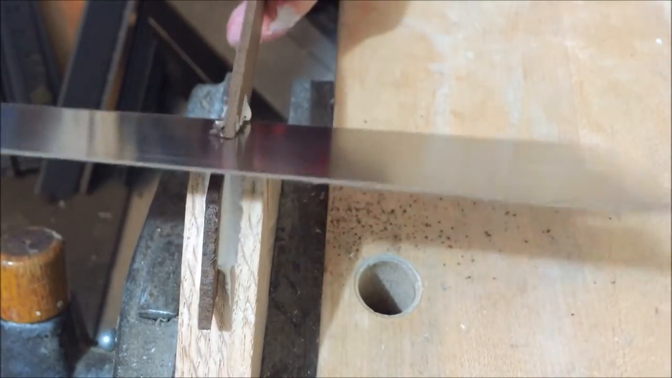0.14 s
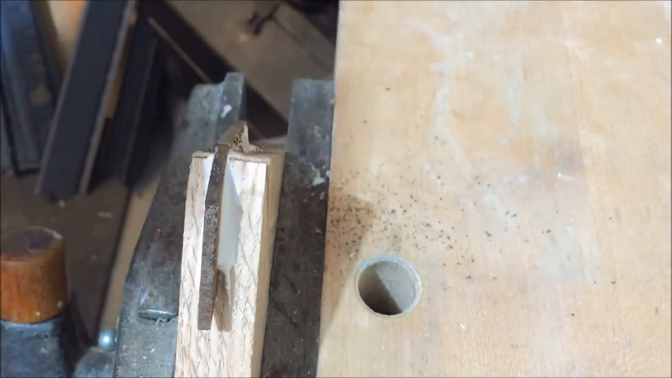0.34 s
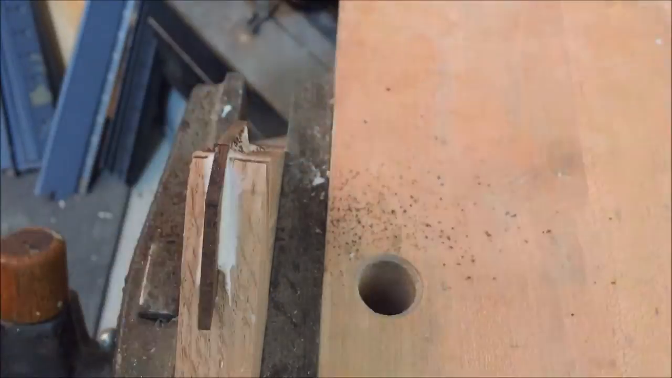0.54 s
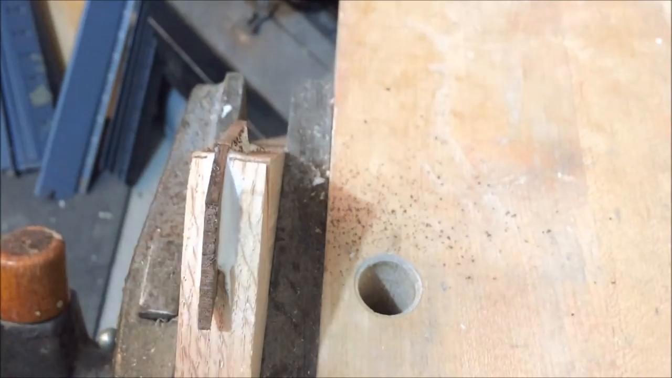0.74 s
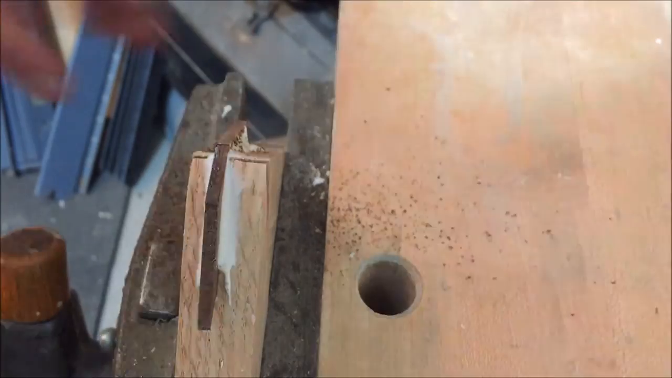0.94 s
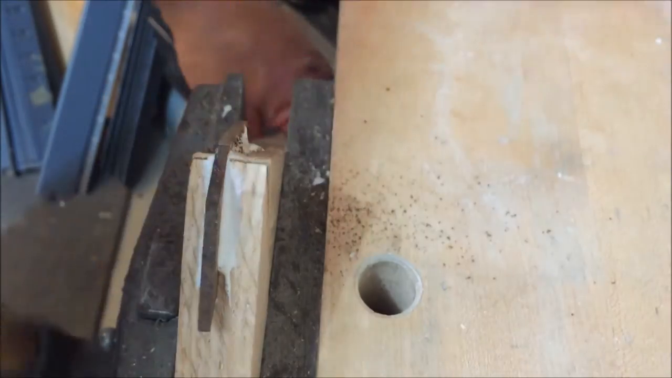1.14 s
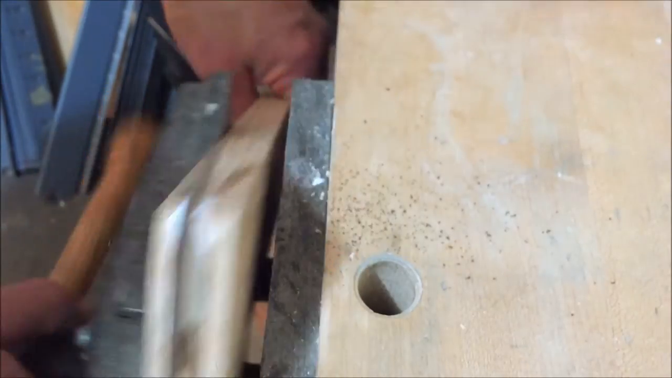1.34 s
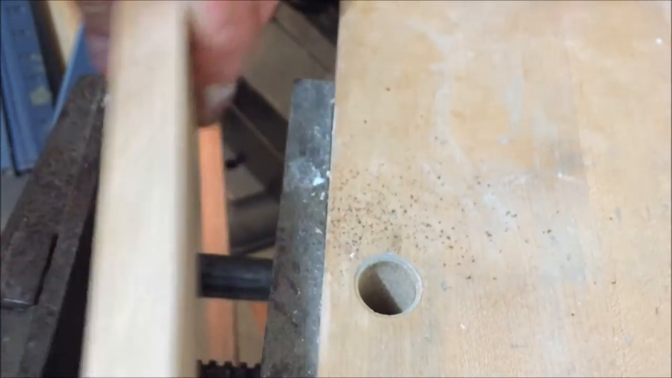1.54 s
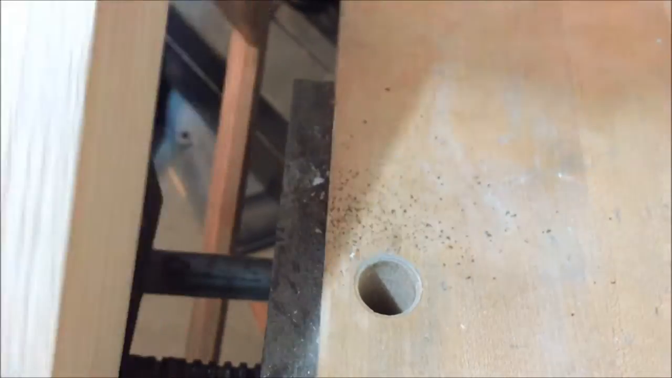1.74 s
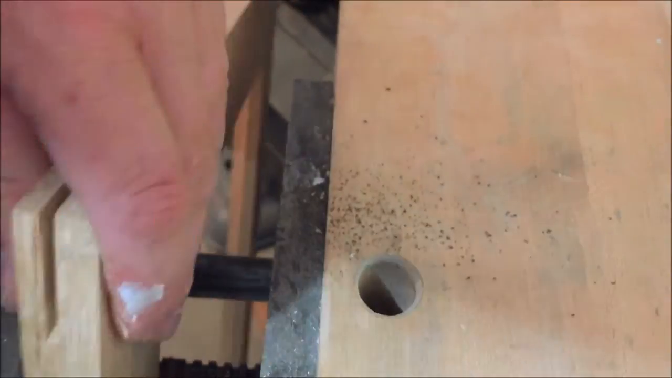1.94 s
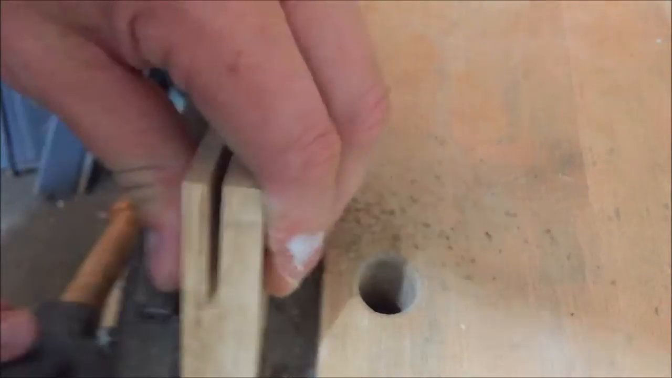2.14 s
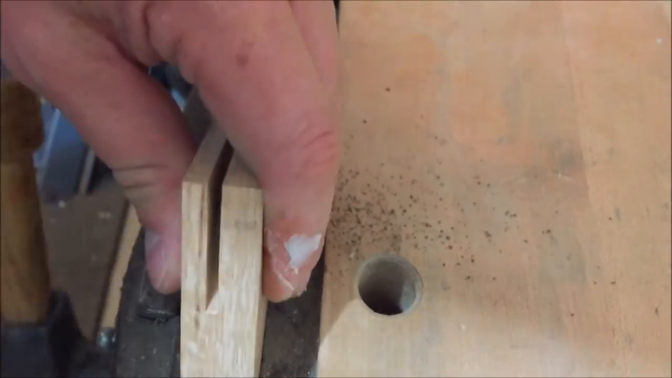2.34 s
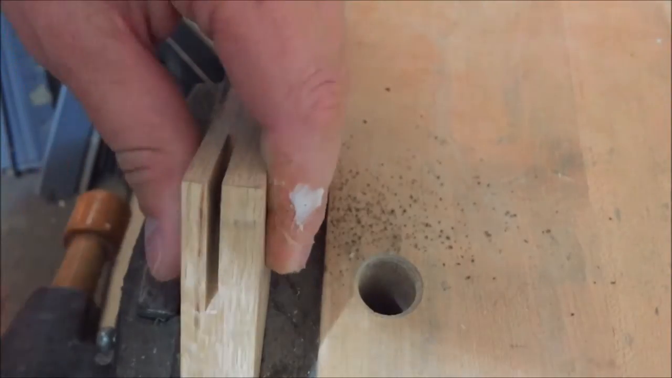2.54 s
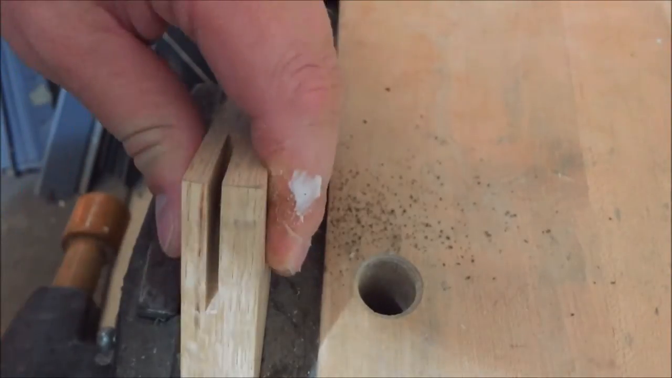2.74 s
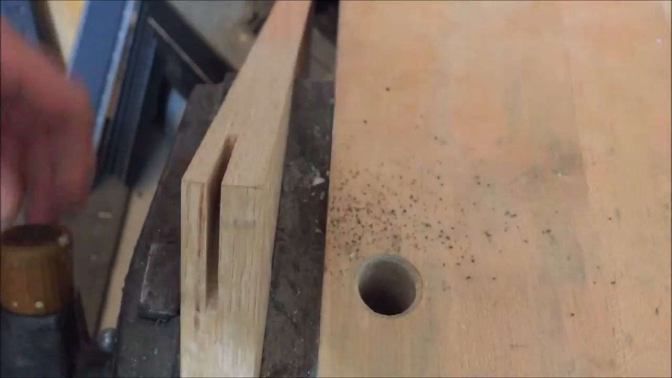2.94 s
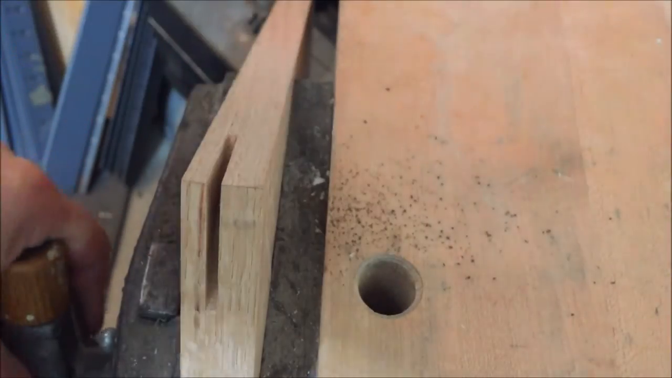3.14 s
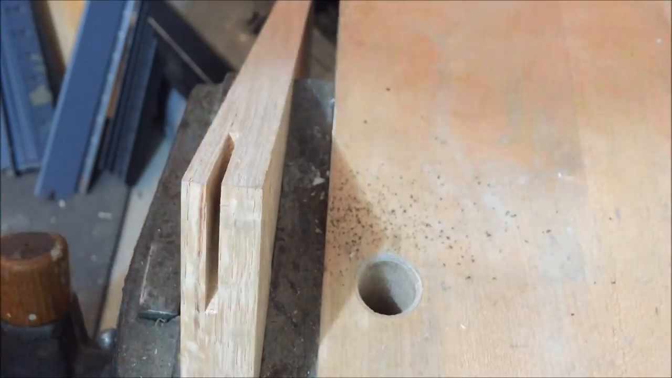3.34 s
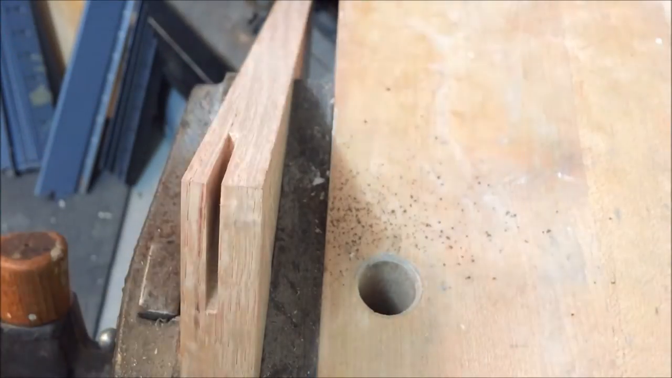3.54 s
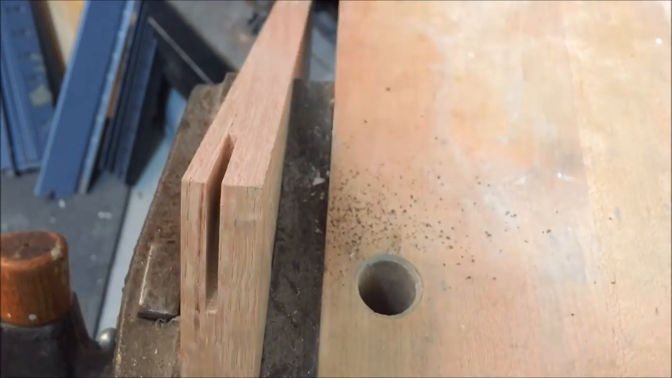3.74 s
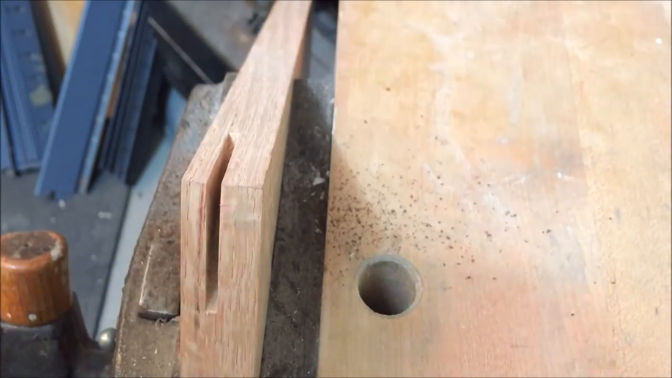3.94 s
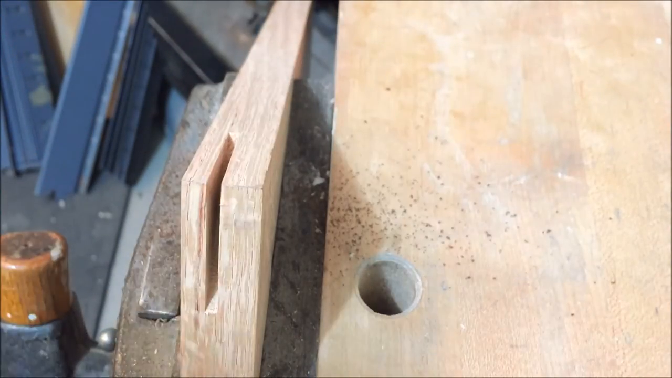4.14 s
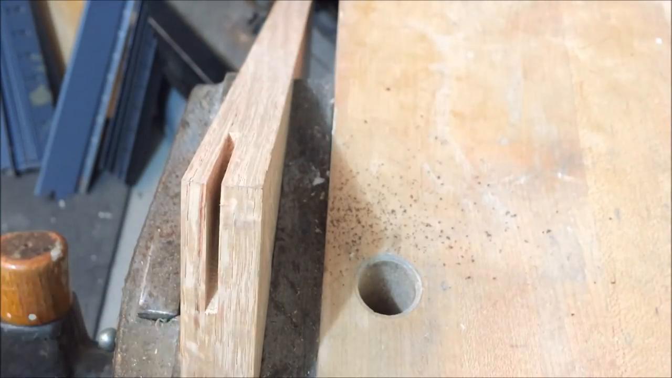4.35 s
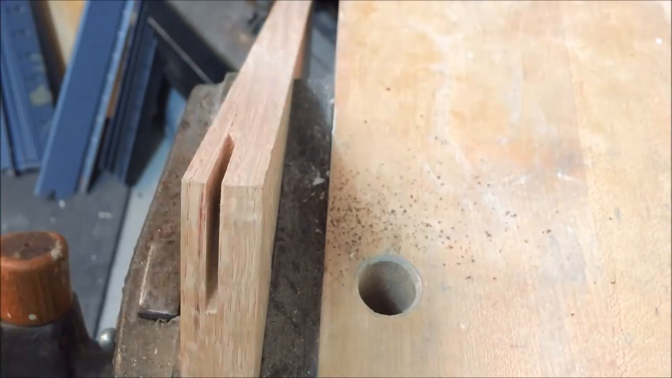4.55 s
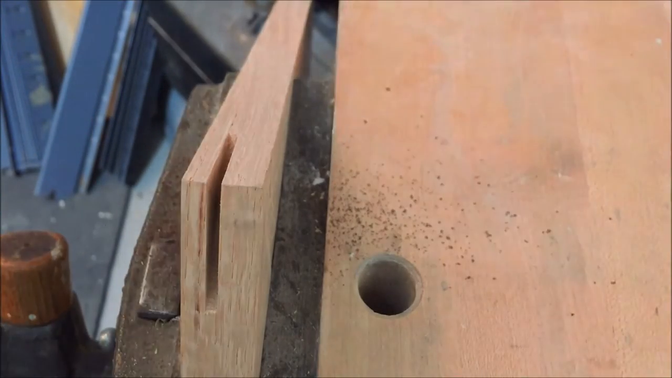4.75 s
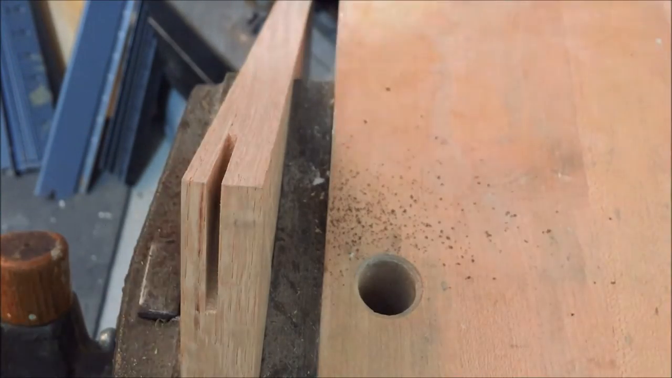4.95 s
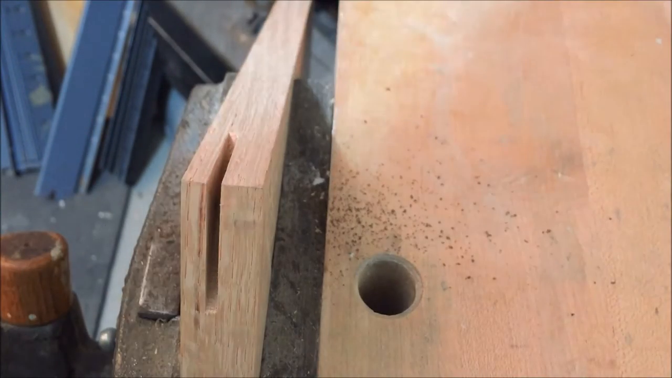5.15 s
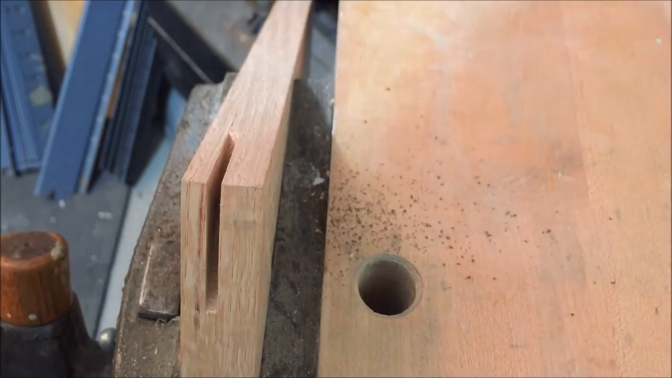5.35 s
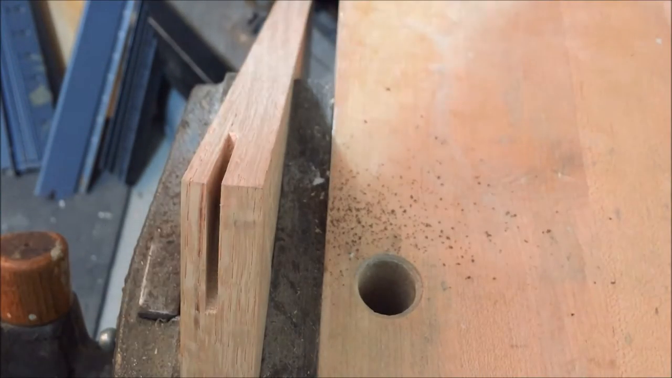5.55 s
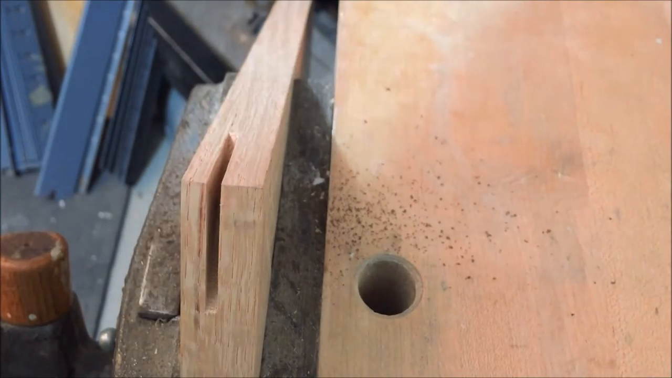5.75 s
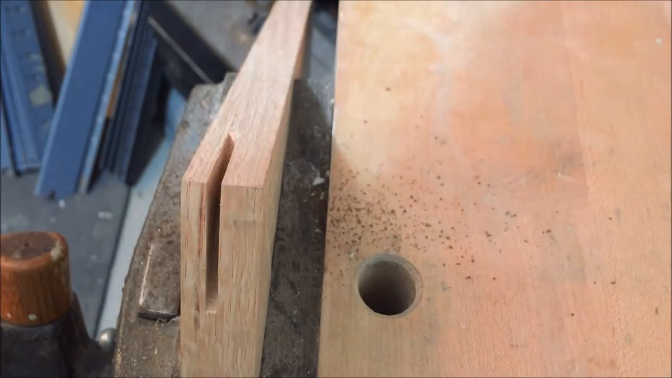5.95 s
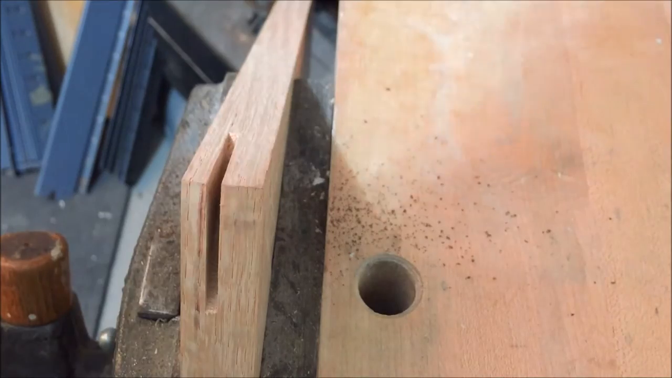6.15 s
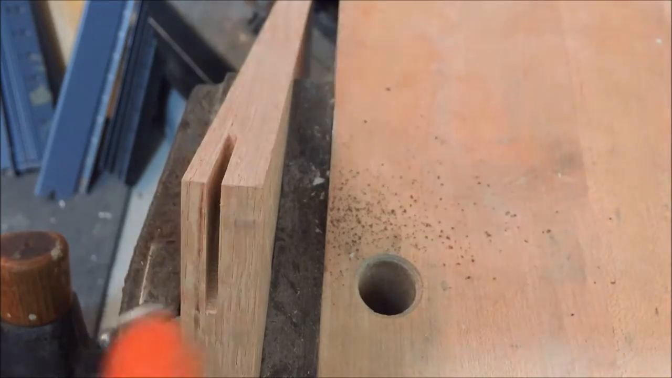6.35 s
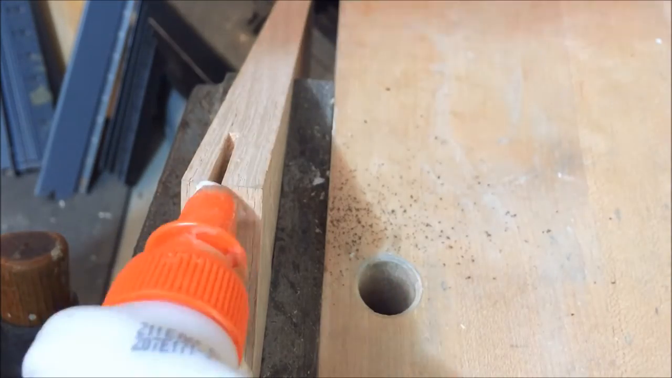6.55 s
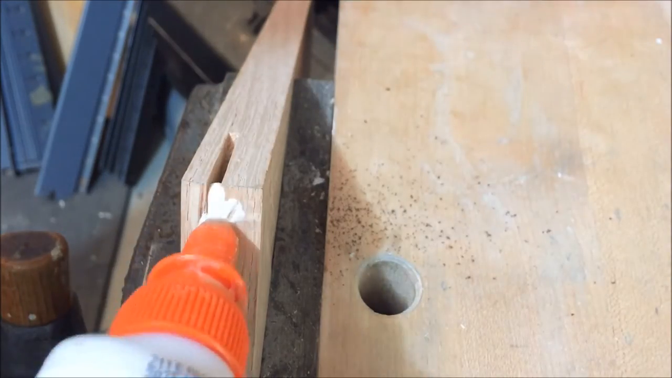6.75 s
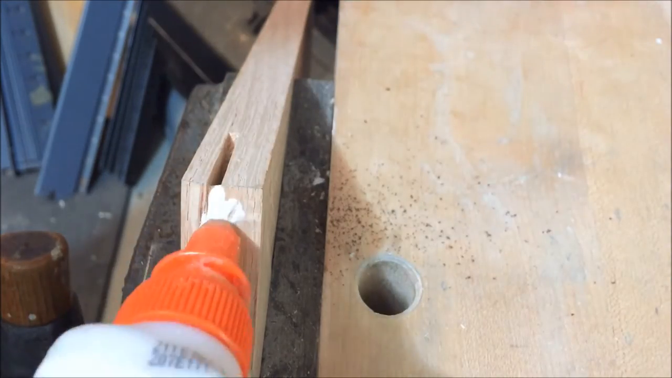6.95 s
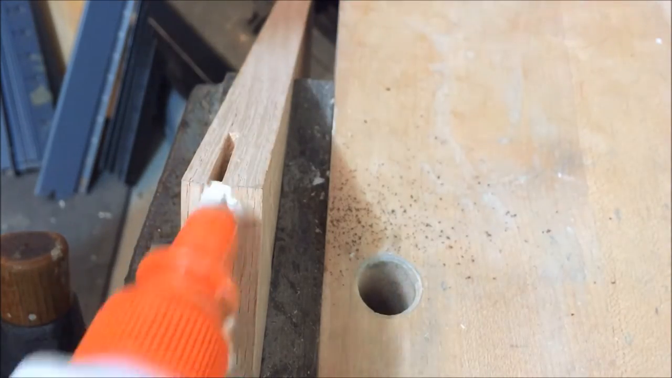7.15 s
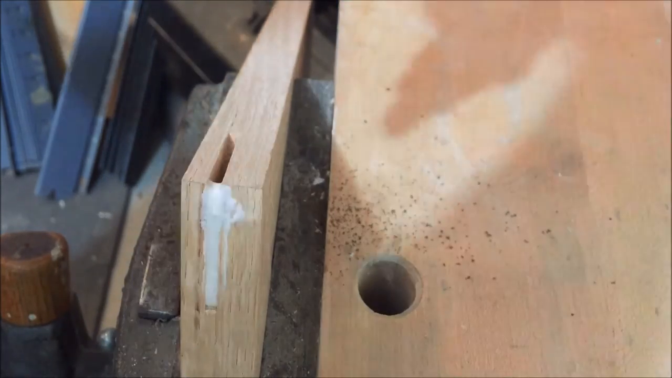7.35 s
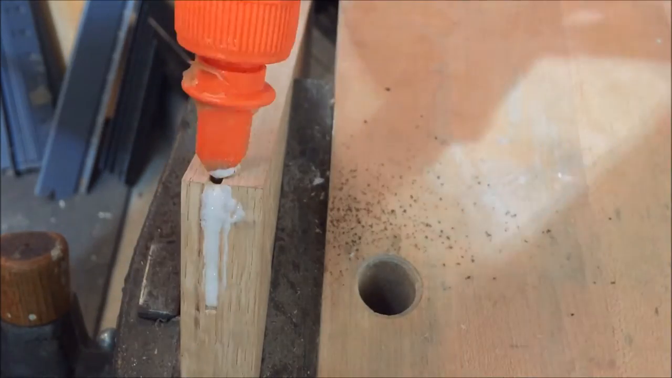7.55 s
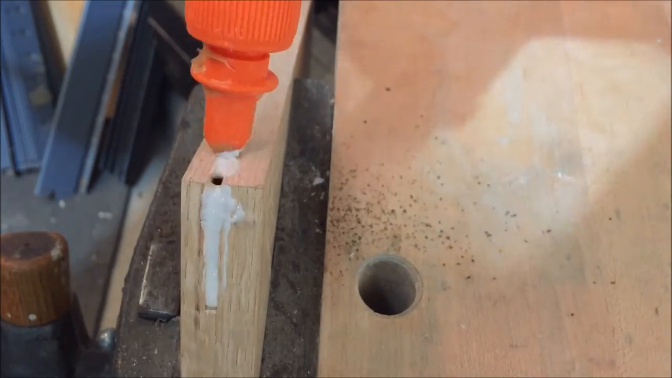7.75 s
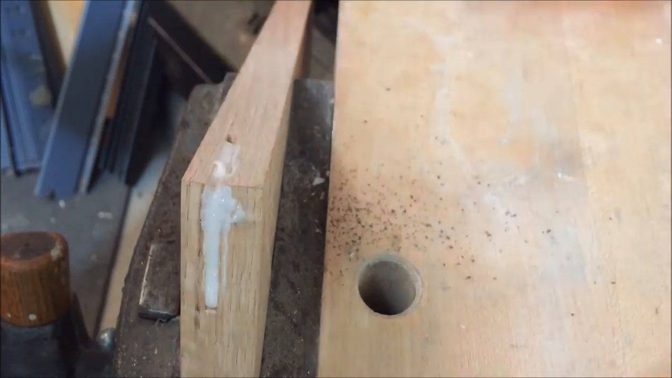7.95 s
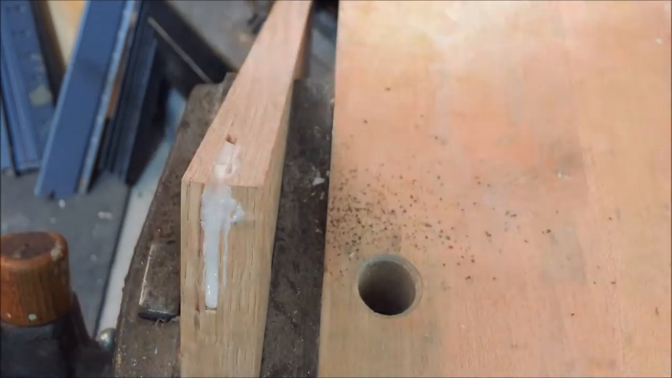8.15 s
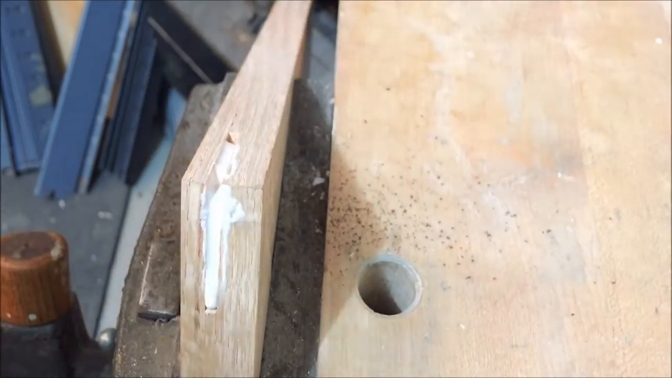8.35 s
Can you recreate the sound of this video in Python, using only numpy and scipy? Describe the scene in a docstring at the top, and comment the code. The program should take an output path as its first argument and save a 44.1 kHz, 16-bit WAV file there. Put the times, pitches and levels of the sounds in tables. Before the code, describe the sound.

Sawing ends with a thin steel ring and sharp clack, a wooden frame bumps into vise jaws, metal clanks, and glue softly blurps.

```python
"""The last strokes of a thin hand saw rasp by; the blade slips free, rings, and bounces down onto the bench.
A wooden frame knocks and rubs on the vise jaws, the screw grates, and the handle clanks on its stop.
Then a glue bottle is tapped and swished and glue pops into the slot, over a faint workshop hum.
Noise-like forces drive decaying modes for saw, wood and steel; glue is short tones, steady or falling in
pitch, touch is shaped noise, and the workshop is coloured air with three wavering fan tones."""
import sys
import numpy as np
from scipy import signal
from scipy.fft import rfft, irfft, next_fast_len
from scipy.io import wavfile

SR = 44100
rng = np.random.default_rng(int(sys.argv[2]) if len(sys.argv) > 2 else 0)


def inscribe(sig):
    """Save sig as 16-bit PCM at rate SR to the path in sys.argv[1].

    A 1-D sig is mono; a 2-D sig holds one channel per row.
    Samples are clipped to [-1, 1] before scaling.
    """
    pcm = np.round(np.clip(np.atleast_2d(sig).T, -1, 1) * 32767)
    wavfile.write(sys.argv[1], SR, pcm.astype(np.int16))


N = 369999
TIME = np.arange(N) / SR

# still workshop air, spectrum before levelling: f/Hz, level/dB
AIR_COLOUR = [(18, -75), (30, -40.5), (75, -44), (165, -20.5), (189, -12), (221, -17.5), (437, -18.5),
              (473, -6), (526, -20.5), (1250, -22), (1350, -26.5), (2540, -31), (3060, -31), (4080, -30.5),
              (16000, -35.5)]
# tones of a running fan: f/Hz, rms level/dB, pitch wander/Hz
FAN_TONES = [(197.6, -77.5, 3.9), (480.6, -72.5, 1.5), (2577, -90.5, 8)]
AIR_DB = -73

# fingers swishing on the bottle: start t/s, end t/s, level/dB
SWISHES = [(3.47, 3.6, -68.5), (4.166, 4.234, -53.5), (4.963, 5.025, -50.5), (5.142, 5.203, -66),
           (5.543, 5.6, -68.5), (6.385, 6.514, -48), (8.061, 8.11, -60)]
# colour of skin and rustle: f/Hz, level/dB
SWISH_COLOUR = [(500, -4), (2500, -18.5), (4200, -9), (6000, -2.5), (10000, 2), (15500, 2)]
# air pockets bursting in the glue: t/s, tone level/dB, start f/Hz, glide/(octaves/s; rises are held flat), t60/s
GLUE_POPS = [(6.485, -53, 973, -85, 0.21), (6.5727, -49, 888, -29, 0.014), (6.5883, -38.5, 840, -59, 0.014),
             (6.713, -48.5, 775, -53, 0.011), (6.8254, -44, 1110, 0.5, 0.0066),
             (6.9459, -39.5, 781, -8, 0.019), (6.961, -59, 986, 0, 0.015), (6.998, -50, 920, 4, 0.0098),
             (7.067, -52.5, 794, -104, 0.017), (7.073, -45, 344, -52, 0.031), (7.215, -51.5, 765, 0, 0.016),
             (7.534, -51, 330.5, -29, 0.071)]

# Body modes, t60 before any damping by hand, cut or jaws: f/Hz, level/dB, t60/s
# glue bottle
BOTTLE_MODES = [(272, -1.5, 0.089), (410, 4, 0.09), (526, 17, 0.09), (820, -11, 0.019), (1050, -1, 0.061),
                (1200, 15.5, 0.088), (1370, 6.5, 0.15), (1485, 7.5, 0.063)]
# vise screw and its handle
HANDLE_MODES = [(570.7, -11.5, .11), (1235, -11, .14), (1284, 9, 0.037), (1410, -1, 0.095),
                (1871, -11, 0.055), (2768, -5, 0.016), (3731, 4, .025), (5156, -8, 0.026),
                (10000, -10, 0.043), (10390, 7, .026), (9900, -8, .022), (10000, -31.5, 0.41),
                (10500, -26, 0.26)]
# wooden frame in the jaws
FRAME_MODES = [(308.2, 2, .1), (400, -2, 0.11), (572, 0.5, 0.13), (640, -3.5, 0.13), (908, -0.5, 0.19),
               (1100, 1, 0.087), (1244, 7, 0.1), (1500, -3.5, 0.12), (2975, -3.5, .045),
               (3470, -1.5, 0.032), (4235, 1.5, 0.061), (8250, -4.5, 0.023), (10570, 3.5, 0.038),
               (14200, -5, .025)]
# bench with the saw on it
BENCH_MODES = [(267, -7, 0.11), (530, -7, .07), (1247, -0.5, 0.083), (1286, -2, 0.098), (1430, -0.5, 0.077),
               (1574, 1, 0.042), (2230, -7, 0.015), (3850, -7, 0.023), (3980, 0.5, .035),
               (4120, -3.5, 0.033), (4917, -2.5, 0.03965), (9800, -0.5, 0.044)]
# steel saw blade
BLADE_MODES = [(2010, 0, 0.14), (2684, -1.5, 2.2), (3200, -16.5, 1.1), (3945, 1, 0.18), (4040, 7, 0.11),
               (4580, -0.5, .5), (6471, -5, 0.27), (7180, 5, 0.27), (7340, -1, 0.81), (9076, -14, 1),
               (10030, 4, 0.17), (11500, -3, 0.42), (13130, -8, 0.44)]

# Blows: t/s, level/dB, brightness/(dB/octave above the second band), thud/dB re level
# fingers and nozzle tap the bottle
BOTTLE_TAPS = [(4.9101, -77, 6.5, -5.5), (5.19, -69, 2.5, -4), (6.2466, -66.5, -2, -5),
               (6.945, -67.5, 1, 3), (7.499, -76, -2, -10), (8.2374, -55, -2, 10),
               (8.247, -64.5, -6.5, 6.5)]
# the vise handle drops on its stop
HANDLE_CLANKS = [(2.9532, -44, -5, -12), (2.959, -33, 4, -11.5), (3.055, -73.5, 3.5, 10)]
# the frame knocks on the jaws; the last three rows, after 4 s, are further knocks with the same ring
FRAME_KNOCKS = [(.8545, -54.5, 2.5, -4.5), (.8775, -58, 7, -22), (.8803, -58.5, 7, 2.5),
                (.9593, -55, -1, -24), (1.1063, -44.5, 0, -11), (1.1205, -46.5, 0.5, -25),
                (1.1477, -38.5, -4.5, -13), (1.1997, -39, 3.5, -9.5), (1.262, -50, -4.5, -19),
                (1.281, -52.5, 1, -30), (1.3295, -56.5, -8.5, -4), (1.385, -40, 4.5, -6),
                (1.371, -57, -9.5, 2), (1.43, -51, 0.5, -3), (1.453, -55.5, 0.5, 5), (1.5873, -39, -4.5, 5),
                (1.6395, -47, -3, -23), (1.6893, -50, -8.5, -3), (1.7877, -61, -9.5, 8.5),
                (1.9978, -34, -1, -4), (2.0594, -47.5, 2.5, -6.5), (2.069, -52, 1.5, -8),
                (2.17, -33, -1.5, -6), (2.1745, -41.5, 3, 2.5), (2.178, -38, 3.5, -5),
                (2.192, -37.5, 1, -4), (2.2567, -52.5, 0, -15.5), (2.3466, -41.5, -4, -18),
                (2.3763, -49, 5, -4.5), (2.409, -50.5, -11, -1), (2.4515, -47.5, -4.5, -7.5),
                (2.4726, -55.5, -15, 4), (2.6064, -55.5, -4, -36), (2.8097, -61, -8.5, 1.5),
                (4.014, -56.5, -13.5, 4), (4.1577, -57, -12.5, -7), (4.2086, -57.5, 1, -13)]
# the saw bounces on the bench
SAW_BOUNCES = [(.6422, -34.5, 1.5, -22.5), (.6494, -27, 1.4, -15.5), (.674, -34.5, 2, -13),
               (.6893, -38.5, -4, -19), (.699, -45, -2.5, -2.5)]
# edges of the bands that make up a blow: f/Hz
BLOW_EDGES_HZ = [240, 700, 2500, 7000, 17000]

# the vise screw turning in its nut: start t/s, end t/s, level/dB
SCREW_TURNS = [(2.335, 2.415, -43.5), (2.79, 2.85, -78), (2.935, 2.96, -51), (3.17, 3.225, -67),
               (3.278, 3.305, -60), (3.305, 3.335, -75.5), (4.165, 4.245, -58.5)]
# saw and frame sliding on bench and jaws: start t/s, length/s, level/dB, brightness/(dB/octave)
SLIDES = [(0.557, .04, -74.5, 8.5), (0.599, 0.065, -52, 6), (0.643, 0.089, -47.5, 4),
          (0.851, 0.047, -49, 4.5), (0.946, 0.015, -58, 6), (1.05, .015, -77, 11),
          (1.067, .028, -48.5, 5.5), (1.098, 0.092, -52, -4), (1.22, 0.048, -53, -1.5),
          (1.382, 0.076, -44, -2), (1.53, 0.021, -63.5, 3), (1.645, 0.098, -52.5, -1.5),
          (1.786, 0.037, -79, -10.5), (1.85, 0.062, -80, 5.5), (2.002, 0.1, -59, -0.5),
          (2.121, 0.057, -49, -2.5), (2.154, 0.064, -45.5, 0), (2.236, 0.044, -61, -3),
          (2.337, 0.058, -42, 0), (2.384, 0.069, -54, -1), (2.81, .035, -69, -2), (2.85, .03, -72, -0.5),
          (2.926, 0.12, -59.5, -0.5)]
# edges of the rumble, scrape and hiss bands: f/Hz
SLIDE_EDGES_HZ = [230, 700, 5000, 17000]
# rasp of rough faces: f/Hz, level/dB
RASP_COLOUR = [(200, 0), (550, -4.5), (1300, -1.5), (2000, -4.5), (4300, -4.5), (7000, -8.5), (10500, -5.5),
               (16000, -12)]
# each push creeps in, eases off and stops
SLIDE_ATTACK_S, SLIDE_SAG_DB_PER_S, SLIDE_RELEASE_T60_S = 0.0088, -70.5, .12
SLIDE_ARCH_DB = -3  # rumble and hiss lie this far under the scrape in between

# the free blade swings past edge-on, then is stilled: t/s, level/dB
BLADE_SWING = [(.29, -0.5), (.32, -2.5), (.35, 1), (.385, -7.5), (.42, 2), (.465, -1.5), (.485, -16),
               (.56, -19.5)]
# saw strokes, back and forth: start t/s, length/s, level/dB
SAW_STROKES = [(-0.035, 0.06, -33.5), (0.024, .066, -37.5), (.091, 0.061, -26.5), (0.165, 0.0627, -37.5),
               (.229, .041, -30.5)]
# rasp of the saw teeth: f/Hz, level/dB
SAW_COLOUR = [(90, -35), (170, -22.5), (300, -14), (450, -10), (800, -17), (1450, -5), (1750, -8.5),
              (2700, -5), (4500, -5.5), (6500, 0), (7600, 11.5), (9200, -3.5), (11000, -1), (15000, -7.5)]
# the blade still chatters as it turns round, and dies away after the last stroke
SAW_TURN_DB, SAW_STOP_T60_S = -47, 0.1513

TOP_HZ = 15900  # upper edge of the microphone


def undb(db):
    """Decibels to gain."""
    return 10 ** (np.asarray(db) / 20)


def unit(x):
    """Scale to rms 1."""
    return x / np.sqrt(np.mean(x ** 2) + 1e-30)


def add(track, s, sound):
    """Mix a sound in at time s."""
    i = max(int(s * SR), 0)
    track[i:i + len(sound)] += sound[:N - i]


def fade(t, t60):
    """Exponential decay, 60 dB down after t60 seconds."""
    return np.exp(-np.log(1000) * t / max(t60, 1e-3))


def band(x, lo_hz, hi_hz, order=3):
    """Causal band-pass."""
    sos = signal.butter(order, [lo_hz, min(hi_hz, SR / 2 - 1)], "band", fs=SR, output="sos")
    return signal.sosfilt(sos, x)


def band_layout(edges_hz):
    """Pairs of band edges, and band centres in octaves from the second band."""
    bands = np.array(list(zip(edges_hz, edges_hz[1:])))
    centres = np.log2(bands).mean(axis=1)
    return bands, centres - centres[1]


def colour(x, points):
    """Shape a sound with a (Hz, dB) spectrum, at rms 1."""
    hz, db = np.transpose(points)
    size = next_fast_len(len(x))
    f = np.maximum(np.fft.rfftfreq(size, 1 / SR), 1)
    gain = undb(np.interp(np.log(f), np.log(hz), db))
    return unit(irfft(rfft(x, size) * gain, size)[:len(x)])


def walk(rate):
    """Random drift: straight lines between normal draws, rate draws a second."""
    knots = rng.standard_normal(4096)
    return np.interp(TIME * rate, np.arange(len(knots)), knots)


def ring(modes, t, scatter_db=0, detune=0):
    """Decaying modes; each contact point shares them out differently."""
    chance = rng.standard_normal((len(modes), 3))
    out = 0
    for (hz, db, t60), (louder, sharper, side) in zip(modes, chance):
        tone = np.sin(2 * np.pi * hz * (1 + detune * sharper) * t)
        out = out + undb(db + scatter_db * louder) * np.sign(side) * fade(t, t60) * tone
    return out


def slips(rate, spread_db):
    """Stick-slip: tiny releases at random moments and of uneven size."""
    size = undb(spread_db * np.minimum(rng.standard_normal(N), 2))
    released = rng.random(N) < rate / SR
    return unit(released * size * rng.choice([-1, 1], N))


def through(x, response):
    """Let a force drive a resonating body."""
    return unit(signal.fftconvolve(x, response)[:N])


def strokes(table, edge_s):
    """Gain curve of (start, end, dB) movements with soft ends."""
    gain = 0
    for start, end, db in table:
        ramp = np.clip(np.minimum(TIME - start, end - TIME) / edge_s, 0, 1)
        gain = gain + undb(db) * ramp ** 2.2
    return gain


def workshop():
    """Still air and the slightly wavering tones of a fan."""
    out = undb(AIR_DB + .5 * walk(5)) * colour(rng.standard_normal(N), AIR_COLOUR)
    for hz, db, wander_hz in FAN_TONES:
        phase = 2 * np.pi * np.cumsum(hz + wander_hz * walk(25)) / SR
        out = out + undb(db + 1.2 * walk(8)) * unit(np.sin(phase))
    return out


def room(x, wet_db=-17, low_t60=0.27, high_t60=0.13):
    """Short, dense reflections from bench and walls; the treble dies sooner."""
    t = TIME[:SR // 2]
    noise = rng.standard_normal(len(t))
    tail = band(noise, 80, 1500) * fade(t, low_t60) + band(noise, 1700, 15000) * fade(t, high_t60)
    tail = tail * np.clip((t - .003) / 0.002, 0, 1)  # silent for the first 3 ms
    tail = tail / np.sqrt(np.sum(tail ** 2))
    return x + undb(wet_db) * signal.fftconvolve(x, tail)[:N]


def handling(rustle_db=-82, patchy_db=3.5):
    """Faint high rustle of hands and sleeves while the bottle is fetched."""
    busy = np.interp(TIME, [3.2, 3.5, 5.6, 6.2], [0, 1, 1, 0])
    rustle = colour(slips(2700, 7.5), SWISH_COLOUR)
    return undb(rustle_db) * busy * undb(patchy_db * walk(22)) * rustle


def swishes(edge_s=0.018, flutter_db=1):
    """Skin slides on smooth plastic with a fine, high hiss."""
    hiss = band(colour(rng.standard_normal(N), SWISH_COLOUR), 800, 11800, order=2)
    return strokes(SWISHES, edge_s) * hiss * undb(flutter_db * walk(80))


def glue(wet_db=-7, wet_t60=0.017, lowest_hz=230):
    """A bursting pocket gives a short tone, steady or falling in pitch, and a wet smack."""
    out, t = np.zeros(N), TIME[:SR // 10]
    for s, db, hz, glide, t60 in GLUE_POPS:
        pitch_hz = hz * 2 ** (min(glide, 0) * t)
        tone = np.sin(2 * np.pi * np.cumsum(pitch_hz) / SR) * fade(t, t60)
        smack = unit(band(rng.standard_normal(len(t)), 326, 1210, order=2)) * fade(t, wet_t60)
        pop = undb(db) * (tone + undb(wet_db) * smack)
        # so small a pocket radiates little below its own pitch
        add(out, s, band(pop, max(lowest_hz, hz / 2), 12000, order=2))
    return out


def blows(table, modes, ring_db, dense_db, crack_t60, wash_t60, damping, top_db, thump_db, detune, low_hang,
          thump_t60=.09):
    """Each blow is a contact crack, the body's main modes, a dense wash of weaker ones and a faint low thump."""
    out, t = np.zeros(N), TIME[:SR // 4]
    attack = int(.015 * SR)  # levels are set over the first 15 ms
    bands, octaves = band_layout(BLOW_EDGES_HZ)
    octaves = np.maximum(octaves, 0)
    filters = [signal.butter(4, edges, "band", fs=SR, output="sos") for edges in bands]
    held = [(hz, db, t60 * damping) for hz, db, t60 in modes]  # hand and jaws shorten the ring
    for s, level_db, brightness, thud_db in table:
        # a harder contact tilts the treble up, more weight behind it adds thud
        levels_db = level_db + brightness * octaves + np.array([thud_db, 0, 0, top_db])
        grain = rng.standard_normal(len(t))
        tones = ring(held, t, scatter_db=2.5, detune=detune)
        for k, (sos, db) in enumerate(zip(filters, levels_db)):
            hang = low_hang ** (1 - k / 2)  # low bands ring longer
            wash = grain * (fade(t, crack_t60 * hang) + undb(dense_db) * fade(t, wash_t60 * hang))
            wash, tone = signal.sosfilt(sos, [wash, tones])
            wash = wash / np.std(wash[:attack])
            tone = tone / np.std(tone[:attack])
            hit = wash + undb(ring_db) * tone
            add(out, s, undb(db) * hit / np.std(hit[:attack]))
        thump = unit(band(rng.standard_normal(len(t)), 95, 190, order=1)) * fade(t, thump_t60)
        add(out, s, undb(levels_db.max() + thump_db) * thump)
    return out


def bottle_taps():
    """Fingers and nozzle strike hollow plastic: soft cracks with a dense wash over the modes."""
    return blows(BOTTLE_TAPS, BOTTLE_MODES, ring_db=-5.5, dense_db=6, crack_t60=.0081, wash_t60=0.024,
                 damping=0.71, top_db=-7, thump_db=-26, detune=0.015, low_hang=1.67)


def handle_clanks():
    """The handle drops on its stop: a short crack and strongly ringing metal modes."""
    return blows(HANDLE_CLANKS, HANDLE_MODES, ring_db=9, dense_db=-17, crack_t60=.003, wash_t60=0.0613,
                 damping=.85, top_db=2.6, thump_db=-34, detune=0.0005, low_hang=2.1)


def screw(grain_rate=700, edge_s=0.0089):
    """The thread grates and sets the screw's middle modes humming."""
    t = TIME[:SR // 8]
    grating = through(slips(grain_rate, 2.2), ring(HANDLE_MODES[1:5], t) * fade(t, 0.019))
    return strokes(SCREW_TURNS, edge_s) * unit(band(grating, 900, 2200, order=2))


def frame_boom(s=1.5885, db=-31, hz=304, t60=0.2):
    """Knocked while held loosely, the whole frame rings in its lowest bending mode."""
    out, t = np.zeros(N), TIME[:SR // 2]
    add(out, s, undb(db) * np.sin(2 * np.pi * hz * t) * fade(t, t60) * (1 - fade(t, 0.021)))
    return out


def frame_knocks():
    """Wood strikes the jaws, and a few later knocks ring the same way: damped modes and wash, with the low
    bands hanging on."""
    return blows(FRAME_KNOCKS, FRAME_MODES, ring_db=0.0, dense_db=-5, crack_t60=.006, wash_t60=0.044,
                 damping=0.6, top_db=-5.5, thump_db=-26, detune=0.027, low_hang=3.7)


def push(start, length):
    """Gain of one slide: a swelling attack, a sagging hold, release."""
    t = TIME - start
    swell = (1 + np.tanh(t / SLIDE_ATTACK_S - 1)) / 2
    sag = undb(SLIDE_SAG_DB_PER_S * np.clip(t, 0, length))
    return swell * sag * fade(np.clip(t - length, 0, 1), SLIDE_RELEASE_T60_S)


def sliding(body_db=-4, judder_db=4.0, catch_db=0, crackle_db=-9, contacts=4):
    """Rough faces catch and release; the frame's colour shifts as the contact point moves."""
    # fine wood grain gives a smooth scrape, with a few larger catches in it
    grain, catches = slips(9000, 2.5), slips(220, 4.5)
    judder = undb(judder_db * walk(90))
    force = (grain + undb(catch_db) * catches) * judder
    t = TIME[:SR // 8]
    pressed = fade(t, .025)  # contact damps the modes
    shares = np.array([undb(10 * walk(16)) for _ in range(contacts)])
    shares = shares / np.sqrt(np.sum(shares ** 2, axis=0))
    body = 0
    for share in shares:
        body = body + share * through(force, ring(FRAME_MODES, t, scatter_db=2, detune=.07) * pressed)
    rasp = colour((grain + undb(crackle_db) * catches) * judder, RASP_COLOUR)
    bands, octaves = band_layout(SLIDE_EDGES_HZ)
    pushes = [(undb(db) * push(start, length), brightness) for start, length, db, brightness in SLIDES]
    out = 0
    for k, ((lo, hi), octave) in enumerate(zip(bands, octaves)):
        # the body counts for less in each higher band
        rub = unit(band(rasp, lo, hi)) + undb(body_db * k) * unit(band(body, lo, hi))
        # a light, glancing slide hisses; a heavy one rumbles
        gain = sum(g * undb(brightness * octave) for g, brightness in pushes)
        out = out + unit(rub) * gain * undb(SLIDE_ARCH_DB * abs(k - 1))
    return out


def saw_bounces():
    """The saw lands on the bench: very short cracks exciting bench modes, with little top."""
    return blows(SAW_BOUNCES, BENCH_MODES, ring_db=3.0, dense_db=-11.5, crack_t60=0.002, wash_t60=0.032,
                 damping=.7, top_db=-18.5, thump_db=-38.5, detune=0.0098, low_hang=1.3)


def free_blade(s=.289, db=-52, flex_db=3.0, scuff_db=-49, scuff_t60=0.26):
    """The last tooth scuffs out of the cut and the blade rings, each mode wavering as the steel flexes."""
    out, t = np.zeros(N), TIME[:SR // 2]
    for mode in BLADE_MODES:
        flex = undb(db + flex_db * walk(35)[:len(t)])
        add(out, s, flex * ring([mode], t) * (1 - fade(t, 0.018)))
    scuff = unit(band(rng.standard_normal(len(t)), 1700, 8000, order=2)) * fade(t, scuff_t60)
    add(out, s, undb(scuff_db) * scuff)
    return out * undb(np.interp(TIME, *np.transpose(BLADE_SWING)))


def saw_force(swell=1.4):
    """The push swells and falls once a stroke; a weak chatter bridges the turns."""
    drive = 0
    for start, length, db in SAW_STROKES:
        progress = np.clip((TIME - start) / length, 0, 1)
        drive = drive + undb(db) * np.abs(np.sin(np.pi * progress)) ** swell
    end = max(start + length for start, length, _ in SAW_STROKES)
    chatter = undb(SAW_TURN_DB) * fade(np.maximum(TIME - end, 0), SAW_STOP_T60_S)
    return np.hypot(drive, chatter)


def saw(tooth_hz=1300, between_db=-9, blade_db=-8, wood_db=-19, plate_db=-2):
    """Teeth catch unevenly in the wood and shake blade and frame."""
    force = saw_force()
    speed = np.maximum(force / force.max(), .02) ** .3  # tooth_hz is the mean rate at full force
    tooth = np.cumsum(tooth_hz * speed * (1 + 0.19 * walk(300))) / SR % 1  # position within one tooth
    fibres = slips(13000, 2) * undb(1.5 * walk(350))
    bites = unit(fibres * (undb(between_db) + np.exp(-tooth / .3)))
    t = TIME[:SR // 8]
    blade = through(bites, ring(BLADE_MODES[7:9], t) * fade(t, 0.053))  # the pair of modes near 7 kHz
    plate = through(bites, rng.standard_normal(len(t)) * fade(t, 0.044))  # the thin plate's many other modes
    wood = colour(bites, [(150, -50.5), (243, 1.0), (270, -11), (312, 12.5), (370, -32.0), (700, -53)])
    rasp = colour(bites + undb(plate_db) * plate, SAW_COLOUR)
    return force * unit(rasp + undb(blade_db) * blade + undb(wood_db) * wood)


def scene():
    """All the bench work, close by, in the small room."""
    gluing = bottle_taps() + glue() + swishes() + handling()
    clamping = sliding() + frame_knocks() + frame_boom() + screw() + handle_clanks()
    sawing = saw() + free_blade() + saw_bounces()
    return (room(sawing + clamping + gluing) + workshop())[None]


def record(dry):
    """The microphone cuts the top with a steep low-pass."""
    return signal.sosfilt(signal.ellip(10, .2, 80, TOP_HZ, fs=SR, output="sos"), dry)


dry = scene()
out = record(dry)
inscribe(out)
```